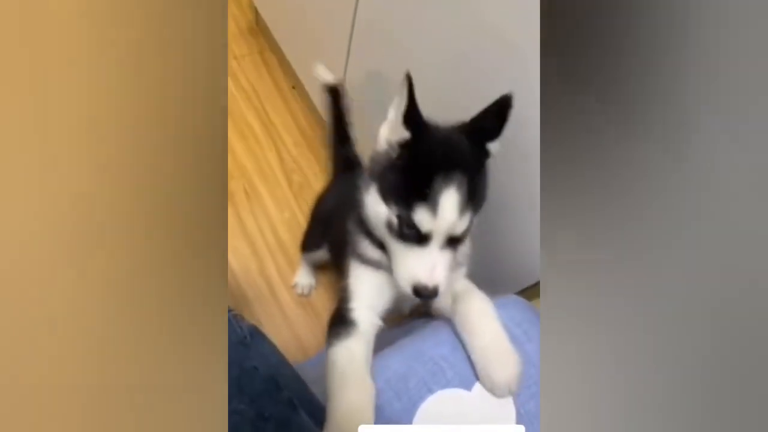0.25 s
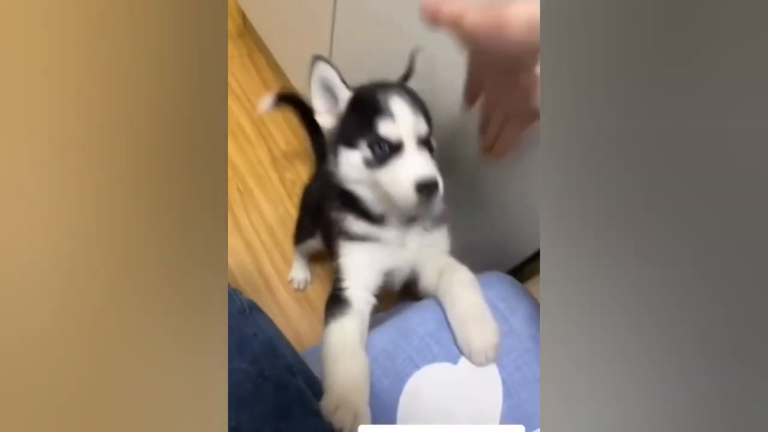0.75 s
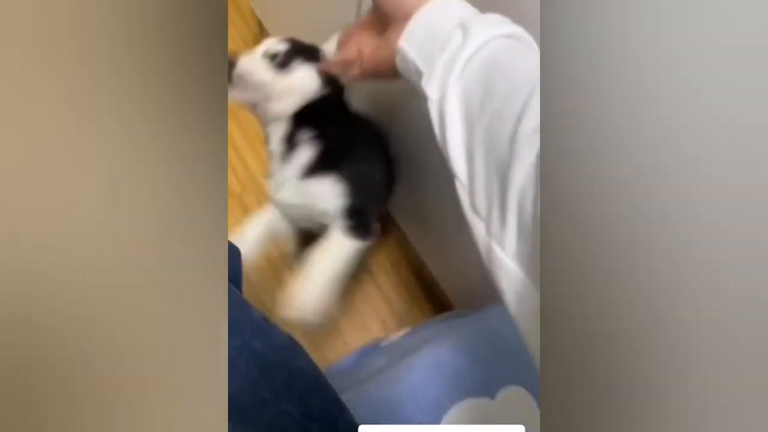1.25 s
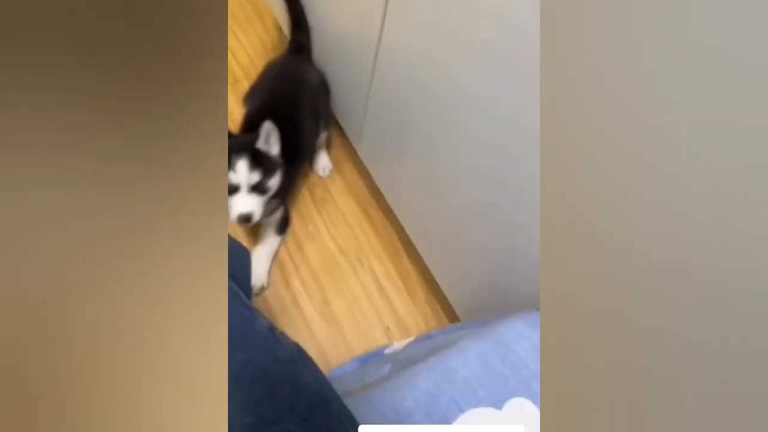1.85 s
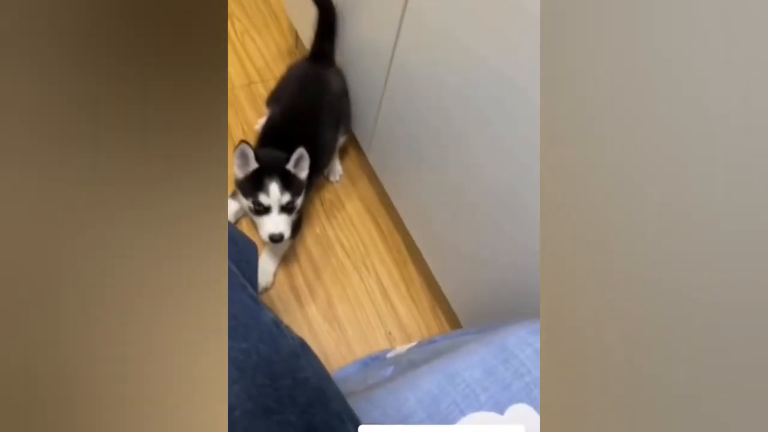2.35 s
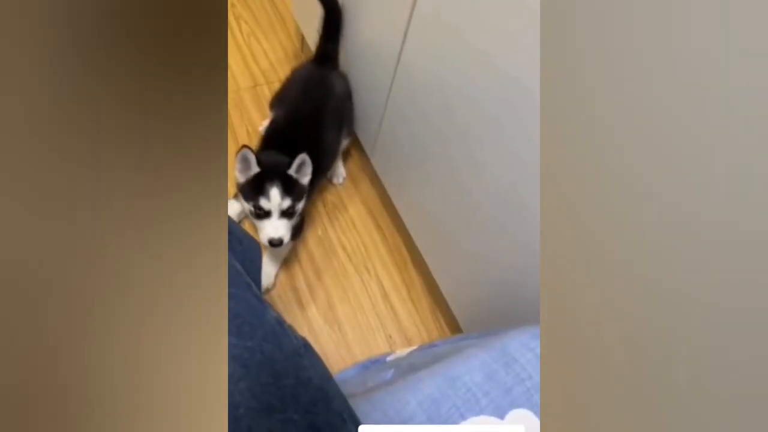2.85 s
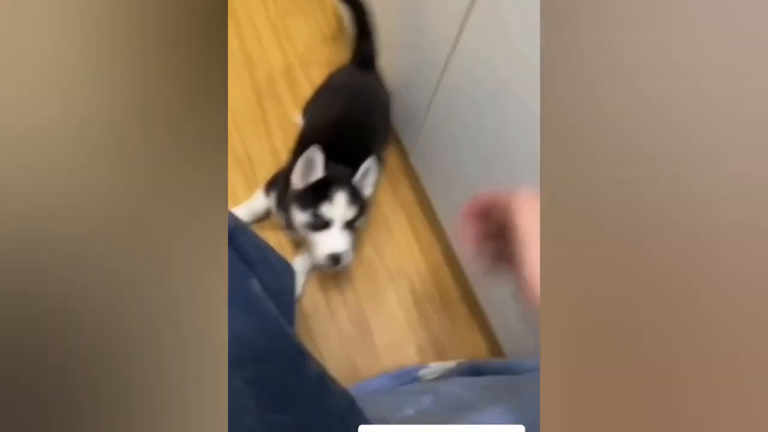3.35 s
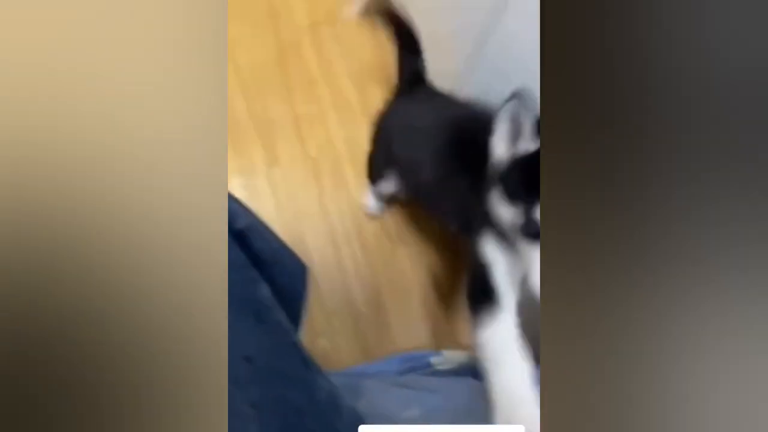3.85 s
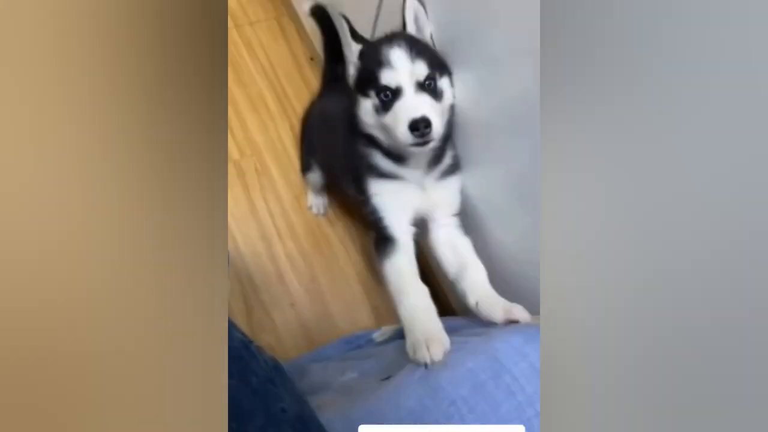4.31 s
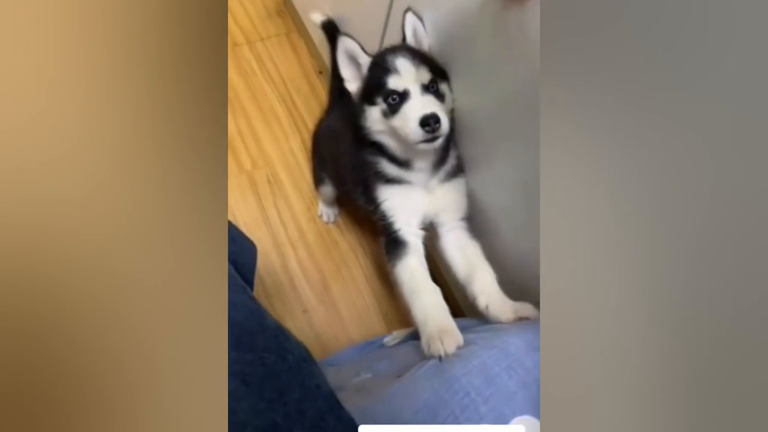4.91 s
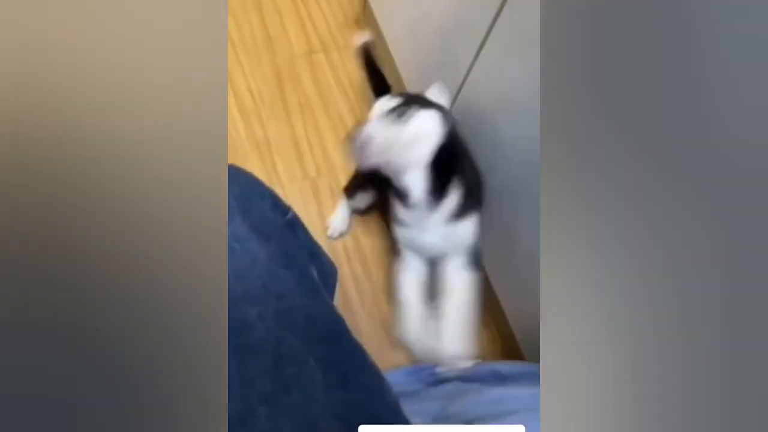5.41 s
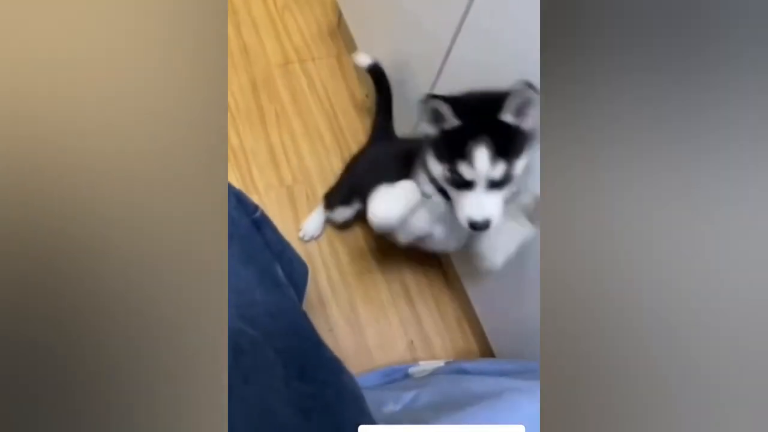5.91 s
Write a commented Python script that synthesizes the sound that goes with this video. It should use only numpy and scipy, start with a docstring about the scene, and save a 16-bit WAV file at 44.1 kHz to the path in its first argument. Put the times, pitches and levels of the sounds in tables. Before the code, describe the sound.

A small indoor room with faint, low steady hum, heard close on a hand-held phone. At 0.06 s a dull soft pat lands with a paw knock and brushing cloth; up to 1.4 s there are only faint taps, claw ticks and light rustle. At 1.5 s the puppy drops onto the springy wooden floor: a hard knock and deep boom, then a quick scramble of woody thuds until 2.0 s, with bright cloth snaps and a firm cushion pat at 1.75 s. The floor rings down and it is almost silent until 3.2 s. Cloth rustles and snaps from 3.3 to 3.7 s with muffled pats. At 3.94 s comes the loudest pounce, with clattering knocks and booms until 4.2 s, while the bumped cabinet door thuds and drones low, fading. Faint taps and rustle follow, slightly firmer near 5.1 to 5.5 s. Rounded, booming thuds land at 5.7, 5.88 and 5.96 s, ending in a light rustle.

```python
"""A puppy pounces on a sprung wooden floor beside a cabinet, close to a hand-held phone.
Its paws knock ringing board modes and tick with the claws; its weight swings the low floor modes.
The bumped cabinet door thuds and drones as fading sine waves. Damped bursts make the pats on the
cushion and phone; shaped noise makes cloth snaps, rustle and a faint room hum."""
import sys
import numpy as np
from scipy import signal
from scipy.fft import rfft, irfft
from scipy.io import wavfile
from scipy.ndimage import uniform_filter1d

SR = 44100
rng = np.random.default_rng(int(sys.argv[2]) if len(sys.argv) > 2 else 0)


def master_out(mix):
    """Clip the mix to full scale and print it as 16-bit PCM to the path in sys.argv[1]."""
    frames = np.transpose(np.atleast_2d(mix))
    ceiling = np.clip(frames, -1, 1)
    pcm = np.round(ceiling * 32767).astype(np.int16)
    wavfile.write(sys.argv[1], SR, pcm)


N = 272097  # length in samples

# steady room tone, spectrum shape: f/Hz, relative level/dB
HUM_SPECTRUM = [(12, -39.5), (20, -5.5), (70, -1.5), (104, -3.5), (129, -12), (417, -31), (1020, -32),
                (2100, -31.5), (3470, -33.5), (13600, -45), (14600, -52.5), (15600, -60)]
# how long echoes in the room last: f/Hz, time to fall 60 dB t60/s
ROOM_T60 = [(100, 1), (300, 0.41), (1000, 0.41), (3000, 0.35), (10000, 0.48)]
# strokes of rubbing cloth: start t/s, length/s, fibre level/dB, low swish relative to fibres/dB
RUSTLE_STROKES = [(0, 0.24, -62.5, 10), (0.164, 0.23, -61.5, 1.5), (0.471, 0.13, -59, 0.5),
                  (0.548, 0.26, -76, 1.5), (0.772, 0.2, -71.5, 9), (0.922, 0.34, -74.5, 14),
                  (1.17, 0.41, -72, 4.5), (1.482, 0.23, -51.5, 5), (1.712, 0.36, -53.5, 6.5),
                  (2.034, 0.3, -65, 0.5), (3.041, .2, -75.5, 10), (3.199, 0.45, -60, -2),
                  (3.48, 0.2, -60.5, 0), (3.585, 0.25, -57.5, 1.5), (3.78, 0.22, -69.5, 6),
                  (3.89, 0.45, -63, 12), (4.094, 0.15, -71, 21.5), (4.26, 0.28, -74, 16),
                  (4.705, 0.23, -71.5, 3.5), (4.867, 0.3, -75.5, 0), (5.024, 0.61, -66, 5.5),
                  (5.378, 0.32, -66.5, 9), (5.54, 0.66, -75.5, 13.5), (5.984, 0.13, -58, 10.5),
                  (6.084, 0.17, -65, 1.5)]
# cloth fibres, spectrum shape: f/Hz, relative level/dB
FIBRE_SPECTRUM = [(710, -21), (1200, -4), (1820, -17), (2490, -3.5), (3060, -7), (6210, -8), (11800, -22),
                  (13900, -27), (15600, -50.5)]
# low swish of the cloth, spectrum shape: f/Hz, relative level/dB
SWISH_SPECTRUM = [(24, -27), (40, -2), (117, 1), (373, -1), (443, -2.5), (1440, -12), (2500, -17.5),
                  (3250, -26), (5500, -120)]
# cloth snaps: t/s, level/dB, centre f/Hz, t60/s, slope below the centre/(dB per octave)
CLOTH_SNAPS = [(.025, -51, 4550, 0.51, 11), (0.215, -48.5, 4720, 0.2, 10), (1.503, -41, 6000, 0.078, 9),
               (1.534, -40.5, 7050, .08, 10), (1.580, -36, 8000, 0.027, -0.5),
               (1.754, -32.5, 4870, 0.072, 5.5), (1.755, -32, 7800, 0.029, 24),
               (1.906, -42.5, 5400, 0.35, 8), (3.061, -57.5, 4800, 0.16, 11), (3.351, -45, 2550, 0.19, 25),
               (3.407, -41.5, 5270, 0.12, 9.5), (3.511, -37, 5960, 0.16, 10),
               (3.667, -28.5, 5640, 0.032, 11.5), (3.677, -33.5, 4350, 0.18, 8),
               (5.374, -42.5, 7800, 0.047, 29), (5.426, -41, 5150, 0.074, 9), (6.03, -53.5, 8800, 0.29, 12)]
# soft pats on the cushion and the phone: t/s, burst peak level/dB, f/Hz, time scale/swings
SOFT_PATS = [(0.063, -15.5, 96.6, 3.74), (.108, -33.5, 460, 3), (0.107, -34, 78.6, 1.4),
             (0.141, -28, 79, 1.4), (0.182, -40, 85, 0.75), (0.215, -35.5, 470, 2.6), (1.58, -20, 440, 5.1),
             (1.7572, -12, 498, 1.7), (3.409, -26.5, 462, 3.6), (3.426, -40.5, 260, 6.9),
             (3.599, -33.5, 410, 5.8), (3.618, -34, 417, 1.3), (3.667, -34.5, 560, 3.7),
             (4.485, -36.5, 445, 4.3), (6.035, -38, 1010, 5.6)]
# bumps of the cabinet door: t/s, thud peak level/dB, drone level before its swell and fall/dB
DOOR_BUMPS = [(0.323, -71, -41.5), (.67, -55, -50.5), (1.489, -22, -44), (1.68, -34, -26.5),
              (3.94, -13, -25), (4.02, -25, -16.5), (4.136, -20.5, -22), (5.696, -25, -47),
              (5.886, -38.5, -34.5), (5.965, -32.5, -50)]
# the door's lowest mode, which drones: f/Hz, t60/s
DOOR_DRONE = (199, 0.39)
# door panel modes in the thud: f/Hz, relative level/dB, t60/s
DOOR_MODES = [(253.3, -1.5, 0.51), (291.5, 3.5, 0.29), (357, -3, 0.37), (685, -6.5, 0.084),
              (1000, -23, 0.13)]
# body weight flexing the floor: t/s, peak level/dB, lift of modes above 65 Hz/dB, ring time factor
FLOOR_BOOMS = [(0.314, -48, 1, 1), (0.488, -52, 2, 0.87), (0.675, -47, 4, 0.6), (0.973, -45, 9, 0.48),
               (1.496, -18.5, 5.5, 0.59), (1.525, -18, -19, .7), (1.62, -22, 4.5, 1.66),
               (1.755, -21.5, 8, 0.47), (1.83, -26, 5.5, 1.53), (1.92, -29.5, 14, 1.28),
               (2.023, -32.5, 24, 1.3), (2.575, -48, -11, 0.088), (3.303, -50, 9, 0.46),
               (3.597, -46, 11, 0.26), (3.818, -47, 0, 0.26), (3.949, -13, 9, 0.68),
               (3.999, -23.5, -15, 0.31), (4.134, -20.5, 7.5, 0.62), (4.191, -17.5, 0, 0.66),
               (4.302, -28, 5.5, 0.92), (5.091, -39, -4, 0.65), (5.25, -36.5, 13, 0.74),
               (5.432, -44.5, 16, 0.5), (5.545, -45.5, 15, 0.46), (5.702, -22, 2.5, 1.32),
               (5.879, -23, -3, 1.46), (5.958, -26.5, -7, 1.9), (6.022, -21, -7, 0.48)]
# low floor modes: f/Hz, relative level/dB, t60 at ring time factor 1/s
FLOOR_MODES = [(59.25, 2.5, 0.61), (80.2, -4, 0.2), (88.5, -5.5, 0.46), (100, -13.5, 0.43), (47.65, -17, 1),
               (129.9, -16, 0.53)]
# paws on the boards: t/s, knock level/dB, claw tick relative to knock/dB, pitch of struck spot f/Hz
PAW_LANDINGS = [(0.056, -34, -17, 286), (0.319, -40, -28, 595), (.333, -37.5, -32, 183),
                (.418, -43, 5, 497), (0.445, -43, -6, 594), (.817, -43.5, -10, 674),
                (0.964, -36.5, -5.5, 593), (.980, -36, -3, 570), (1.015, -43, 7, 500),
                (1.028, -40, -11, 377), (1.077, -45.5, -5, 700), (1.328, -48, -3, 393),
                (1.487, -16, -16.5, 304), (1.507, -19.5, -31, 300), (1.536, -23, -15.5, 157),
                (1.676, -18.5, -0.5, 197), (1.716, -19, -1, 222), (1.827, -25, -8.5, 206),
                (1.868, -27, -8.5, 614), (1.906, -26.5, -16, 217), (1.96, -31, -20, 207),
                (3.317, -42.5, -27, 297), (3.373, -38.5, -18, 670), (3.939, -11, -6, 840),
                (3.948, -13.5, -11, 265), (3.963, -23.5, -22, 150), (4.0178, -16.5, -6, 207),
                (4.128, -20.5, 2.5, 680), (4.164, -16.5, -11, 215), (4.187, -23, -34, 290),
                (4.384, -40.5, -14, 694), (4.429, -39, -11, 307), (4.486, -41.5, -2, 156),
                (4.685, -48.5, -4.5, 600), (4.811, -48.5, 5.5, 280), (5.078, -33, -7.5, 406),
                (5.175, -40, -17, 700), (5.246, -31, -29, 280), (5.281, -34.5, -32, 200),
                (5.43, -34, -6, 410), (5.451, -40.5, -11, 230), (5.481, -40, -13, 240),
                (5.543, -47, -13, 236), (5.695, -23, -13.5, 275), (5.876, -25, -6.5, 182),
                (5.884, -30, -21, 680), (5.963, -29.5, -30, 273), (6.034, -36.5, -19, 580)]
# modes of the boards: f/Hz, relative level/dB
BOARD_MODES = [(151, 0.5), (180, -5), (199, -3), (228, -3), (250, -3), (291, -3), (330, -5.5), (363, -10),
               (409, -2.5), (435, -5), (528, -2), (610, -2.5), (705, 2), (800, -5), (920, 1), (1050, -2),
               (1240, -3), (1530, -36)]
# how long board modes ring: f/Hz, t60 at ring time factor 1/s
BOARD_T60 = [(150, 0.14), (400, 0.089), (1500, 0.015)]
# dense small board modes, spectrum shape: f/Hz, relative level/dB
SCATTER_SPECTRUM = [(100, -9), (250, 1), (700, -0.5), (1500, -13), (2600, -10), (5000, -29), (12000, -59.5)]
# how long the small modes ring: f/Hz, t60 at ring time factor 1/s
SCATTER_T60 = [(100, 0.15), (300, 0.21), (1000, 0.17), (3000, 0.13), (10000, 0.064)]
# claw tick, spectrum shape: f/Hz, relative level/dB
CLAW_SPECTRUM = [(400, -26), (1000, 4), (1800, -2), (2400, 0), (3200, -6), (4200, -7), (5500, -9.5),
                 (8000, -18), (15000, -45)]

EDGE_HZ = 15800  # upper band limit
HUM_DB = -63.5  # middle level of the room tone
STROKE_SKEW, STROKE_ROUND = 0.65, 1.42  # arch of a stroke: below 1 peaks early; higher is more pointed
STIR_DB, STIR_SWISH_DB = -86, 15  # faint stirring between strokes; its swish relative to its fibres
BRIGHT_DB = 0.9  # fibre treble is raised, and the rest lowered, by this much
RING, RING_PER_OCTAVE = 1.364, 0.83  # ring time factor at 300 Hz; multiplier per octave up (stiffer spot)
DULLING = 0.23  # claw tilt in dB per octave, lost for each dB of knock above -41.5 dB
NAIL_HZ, NAIL_RISE = 2185, 0.025  # claw's own ring; octaves up per dB of tick above -40.5 dB
NAIL_SHARE, NAIL_S = 0.84, 0.0011  # strength of that ring; its decay time constant in seconds


def gain_of(db):
    """Turns decibels into a gain."""
    return 10 ** (np.asarray(db) / 20)


def evened(x):
    """Scales a sound to rms 1."""
    return x / np.sqrt(np.mean(x ** 2) + 1e-20)


def peaked(x):
    """Scales a sound to peak 1."""
    return x / (abs(x).max() + 1e-20)


def read(points, hz):
    """Reads between the points of a table, along a log-frequency axis."""
    f, value = np.transpose(points)
    return np.interp(np.log(hz + 1), np.log(f + 1), value)


def add(mix, s, sound):
    """Mixes a sound in, starting at time s in seconds."""
    part = mix[round(s * SR):][:len(sound)]
    part += sound[:len(part)]


def coloured(x, points):
    """Filters a sound by a spectrum given in dB."""
    hz = np.fft.rfftfreq(len(x), 1 / SR)
    return irfft(rfft(x) * gain_of(read(points, hz)), len(x))


def smoothed(x, size):
    """Averages neighbouring samples twice, leaving slow changes."""
    return uniform_filter1d(uniform_filter1d(x, size), size)


def dying(x, t60):
    """Lets each frequency band fall by 60 dB in its own time t60(Hz)."""
    hz, t, bands = signal.stft(x, SR, nperseg=256)
    fall = gain_of(-60 * t / t60(hz)[:, None])
    return signal.istft(bands * fall, SR, nperseg=256)[1][:len(x)]


def hum():
    """Steady room tone: shaped noise whose level wavers a little."""
    waver_db = 0.8 * evened(smoothed(rng.standard_normal(N), 2000))
    return gain_of(HUM_DB + waver_db) * evened(coloured(rng.standard_normal(N), HUM_SPECTRUM))


def room(x):
    """Sparse reflections of random sign, each band dying at its own pace."""
    echoes = np.zeros(SR // 2)
    at = np.arange(200, len(echoes) - 20, 20)
    at = at + rng.integers(0, 20, len(at))
    echoes[at] = rng.choice([-1., 1.], len(at))
    tail = dying(echoes, lambda f: read(ROOM_T60, f))
    return signal.fftconvolve(x, tail / np.linalg.norm(tail))[:N]


def patchy(x, patchy_db):
    """Scrapes catch now in one band, now in another: random patches over time and frequency."""
    bands = signal.stft(x, nperseg=256)[2]
    patches = rng.standard_normal(bands.shape[::-1])  # time runs down, frequency across
    patches = uniform_filter1d(patches, size=9, axis=0)
    patches = evened(uniform_filter1d(patches, size=7, axis=1))
    return signal.istft(bands * gain_of(patchy_db * patches.T), nperseg=256)[1][:len(x)]


def rustle():
    """Clumped fibre crackle over a smooth hiss, with a low swish that follows the same rubbing."""
    level = np.full(N, gain_of(STIR_DB))
    swish_level = np.full(N, gain_of(STIR_DB + STIR_SWISH_DB))
    for s, length, level_db, swish_db in RUSTLE_STROKES:
        progress = np.arange(0, 1, 1 / (length * SR))
        arch = abs(np.sin(np.pi * progress ** STROKE_SKEW)) ** STROKE_ROUND
        add(level, s, gain_of(level_db) * arch)
        add(swish_level, s, gain_of(level_db + swish_db) * arch)
    clumps = gain_of(2.0 * evened(smoothed(rng.standard_normal(N), 500)))
    grain_gain = gain_of(np.minimum(rng.exponential(1, N), 5))
    grains = grain_gain * (rng.random(N) < 1500 / SR)  # about 1500 a second
    crackle = 1 + 0.28 * evened(uniform_filter1d(grains, 12))
    hiss = rng.standard_normal(N) * crackle
    fibres = evened(patchy(coloured(hiss * clumps, FIBRE_SPECTRUM), patchy_db=2.0))
    low = coloured(fibres, [(4000, 0), (6000, -6), (9000, -40)])
    tilted = low * gain_of(-BRIGHT_DB) + (fibres - low) * gain_of(BRIGHT_DB)
    swish = evened(coloured(rng.standard_normal(N), SWISH_SPECTRUM) * clumps)
    return level * tilted + swish_level * swish


def snaps():
    """Cloth snaps: bright cracks of noise with a short fizzing tail."""
    out, t = np.zeros(N), np.arange(SR // 4) / SR
    for s, level_db, hz, t60, narrow_db in CLOTH_SNAPS:
        band = [(hz / 8, -3 * narrow_db), (hz, 0), (4 * hz, -3 * narrow_db)]
        fizz = evened(coloured(rng.standard_normal(len(t)), band))
        crack = 0.3 * np.exp(-t / 0.0012)
        tail = 0.46 * gain_of(-60 * t / t60)
        onset = np.minimum(t / (0.045 * t60), 1)
        add(out, s, gain_of(level_db) * fizz * (crack + tail) * onset)
    return out


def pats():
    """Heavily damped bursts, each with a dull puff of squeezed filling after it."""
    out, t = np.zeros(N), np.arange(SR // 5) / SR
    for s, peak_db, hz, swings in SOFT_PATS:
        u = t * hz / swings  # time in units of the burst's own scale
        burst = peaked(u ** 2.24 * np.exp(-6.5 * u) * np.sin(2 * np.pi * hz * t))
        dull = [(0.22 * hz, -14), (hz, 0), (3.2 * hz, -8), (6 * hz, -35)]
        puff = evened(coloured(rng.standard_normal(len(t)), dull))
        puff = puff * np.exp(-t / 0.0092) * np.minimum(u / 0.58, 1)
        add(out, s, gain_of(peak_db) * (burst + 0.12 * puff))
    return out


def door():
    """The bumped cabinet door: a short thud of panel modes, and one mode that swells and drones on."""
    out, t = np.zeros(N), np.arange(SR) / SR
    hz, db, t60 = np.transpose(DOOR_MODES)[:, :, None]
    modes = gain_of(db - 60 * t / t60) * np.sin(2 * np.pi * hz * t)
    thud = peaked(modes.sum(0) * (1 - np.exp(-t / 0.0021)))
    drone_hz, drone_t60 = DOOR_DRONE
    drone = gain_of(-60 * t / drone_t60) * np.sin(2 * np.pi * drone_hz * t)
    drone = drone * (1 - np.exp(-t / 0.0071))
    for s, thud_db, drone_db in DOOR_BUMPS:
        add(out, s, gain_of(thud_db) * thud + gain_of(drone_db) * drone)
    return out


def booms():
    """A slow push of body weight sets the low floor modes swinging, so each boom swells in."""
    out, t = np.zeros(N), np.arange(SR) / SR
    hz, db, t60 = np.transpose(FLOOR_MODES)[:, :, None]
    swell = (1 - np.exp(-t / 0.0087)) ** 2
    for s, peak_db, upper_db, ring in FLOOR_BOOMS:
        mode_db = db + upper_db * (hz > 65) - 60 * t / (t60 * ring)
        modes = gain_of(mode_db) * np.sin(2 * np.pi * hz * t)
        add(out, s, gain_of(peak_db) * peaked(modes.sum(0) * swell))
    return out


def pad_knock(t, spot_hz):
    """A pad strikes board modes and a dense scatter of small ones; those near the spot's pitch lead."""
    hz, db = np.transpose(BOARD_MODES)[:, :, None]
    ring = RING * RING_PER_OCTAVE ** np.log2(spot_hz / 300)
    level_chance, phase_chance, pitch_chance = rng.standard_normal((3, len(BOARD_MODES), 1))
    near_db = -7 * abs(np.log2(hz / spot_hz))
    loaded_hz = hz * (1 + 0.025 * pitch_chance)  # the weight on the board detunes it a little
    fall_db = -60 * t / (read(BOARD_T60, hz) * ring)
    swing = np.sin(2 * np.pi * loaded_hz * t + 1.1 * phase_chance)
    modes = gain_of(db + near_db + 2 * level_chance + fall_db) * swing
    modes = modes * (1 - np.exp(-t * hz / 0.26))  # bending waves bring the treble first
    spread = [(f, d - 2.4 * abs(np.log2(f / spot_hz))) for f, d in SCATTER_SPECTRUM]
    scatter = evened(coloured(rng.standard_normal(len(t)), spread))
    scatter = dying(scatter, lambda f: ring * read(SCATTER_T60, f))
    return (peaked(modes.sum(0)) + 0.15 * scatter) * (1 - np.exp(-t / 0.0017))


def claw_tick(t, knock_db, claw_db):
    """A claw ticks on the varnish: a noise click, duller for harder knocks, plus its own short ring."""
    tilt_db = -DULLING * (knock_db + 41.5)
    tilted = [(f, d + tilt_db * np.log2(f / 2600)) for f, d in CLAW_SPECTRUM]
    fall = np.exp(-t / 0.00093) + 0.2 * np.exp(-t / 0.0084) + 0.056 * gain_of(-60 * t / 0.33)
    click = evened(coloured(rng.standard_normal(len(t)), tilted)) * fall * np.minimum(t / 0.00052, 1)
    nail_hz = NAIL_HZ * 2 ** (NAIL_RISE * max(knock_db + claw_db + 40.5, 0))
    nail = np.sin(2 * np.pi * nail_hz * t) * np.exp(-t / NAIL_S) * np.minimum(t / 0.00044, 1)
    return click + NAIL_SHARE * nail


def paws():
    """Each landing joins the knock of a pad with the tick of a claw."""
    out, t = np.zeros(N), np.arange(SR // 2) / SR
    for s, knock_db, claw_db, spot_hz in PAW_LANDINGS:
        knock = pad_knock(t, spot_hz)
        tick = gain_of(claw_db) * claw_tick(t, knock_db, claw_db)
        add(out, s, gain_of(knock_db) * (knock + tick))
    return out


def scene():
    """Adds up all the sources; the small room echoes paws, pats and snaps, but not their bass."""
    near = paws() + pats() + snaps()
    no_bass = signal.butter(2, 180, "high", fs=SR, output="sos")
    wet = signal.sosfilt(no_bass, room(near))
    return (near + gain_of(-8.5) * wet + booms() + door() + rustle() + hum())[None]


def record(dry):
    """The microphone loses the deepest bass; then a steep filter limits the treble."""
    thinned = signal.sosfilt(signal.butter(2, 35, "high", fs=SR, output="sos"), dry)
    band_limit = signal.firwin(511, EDGE_HZ, window=("kaiser", 9), fs=SR)
    return signal.oaconvolve(thinned, band_limit[None], "same")


dry = scene()
out = record(dry)
master_out(out)
```